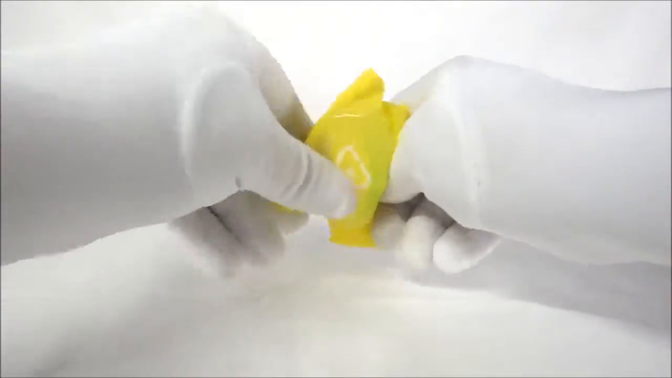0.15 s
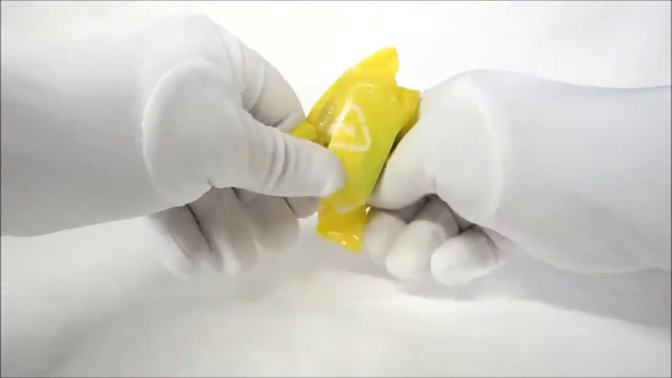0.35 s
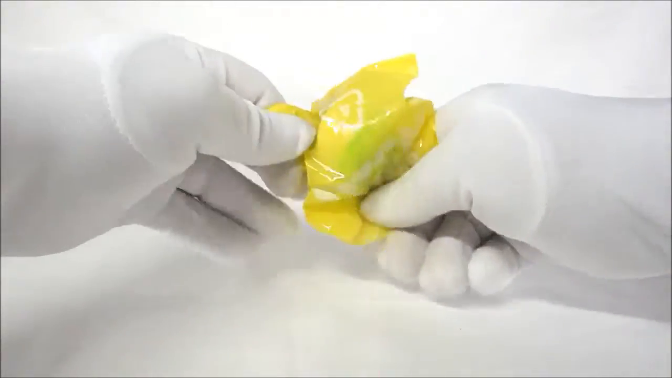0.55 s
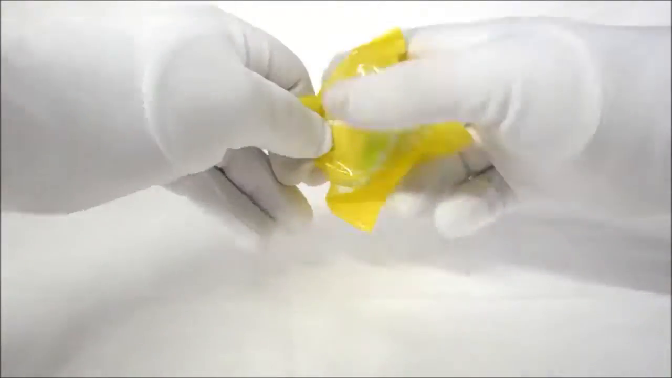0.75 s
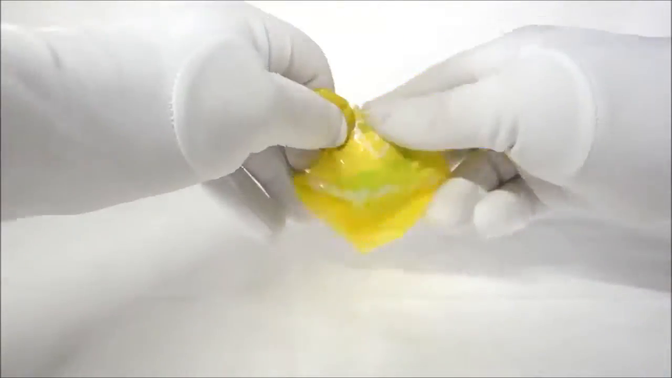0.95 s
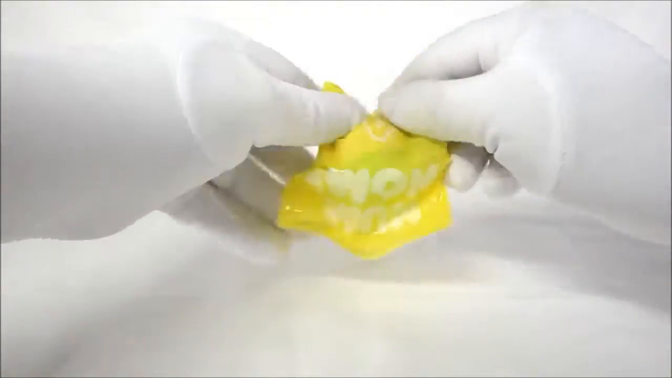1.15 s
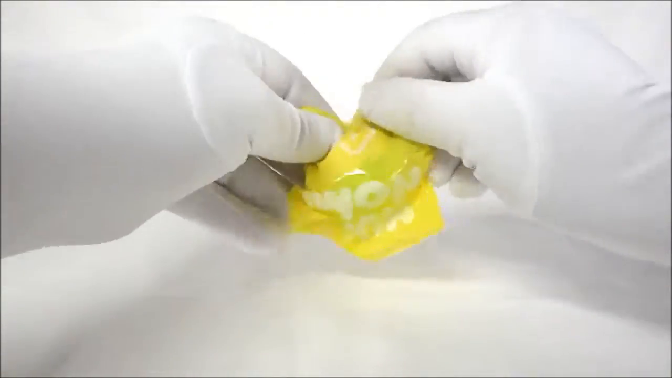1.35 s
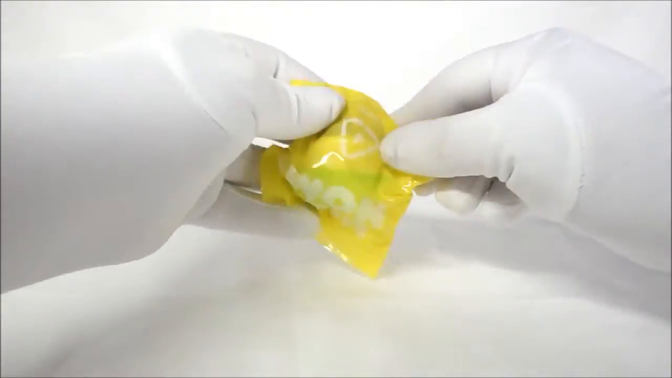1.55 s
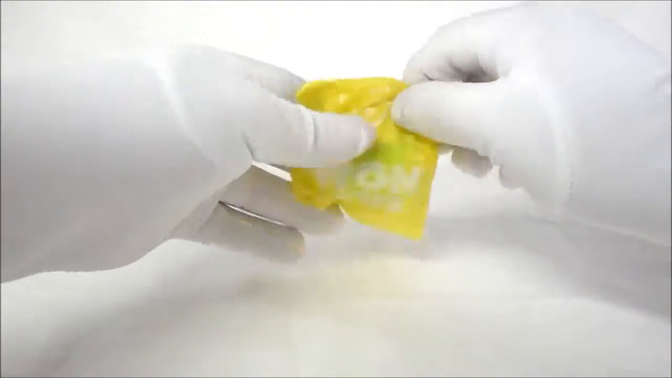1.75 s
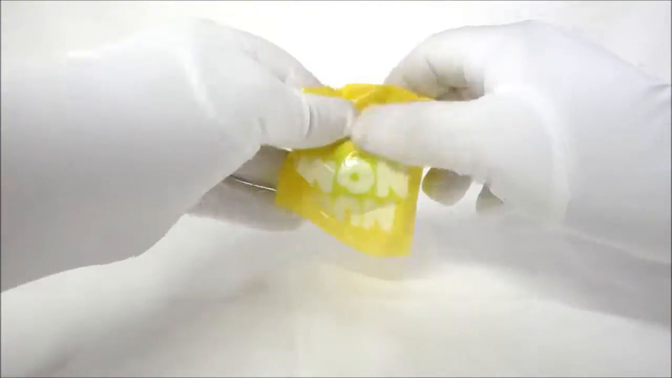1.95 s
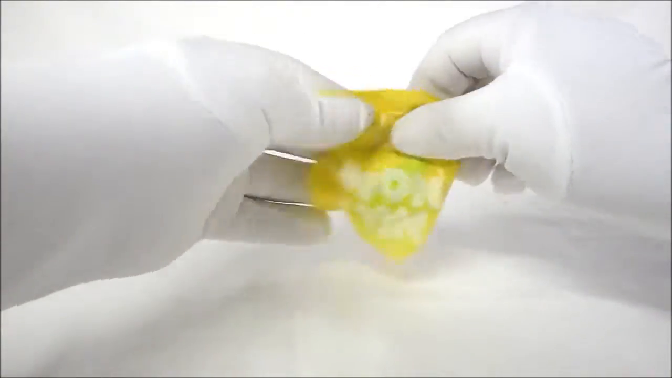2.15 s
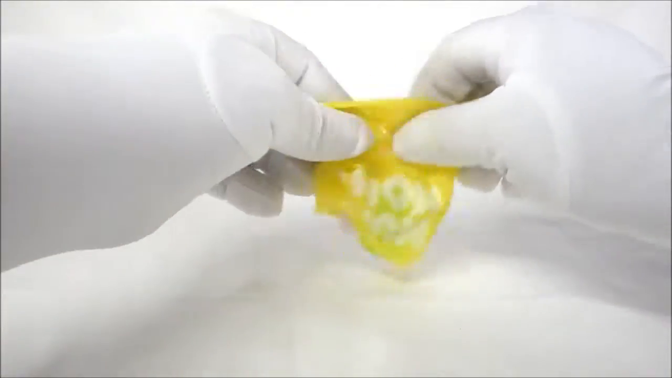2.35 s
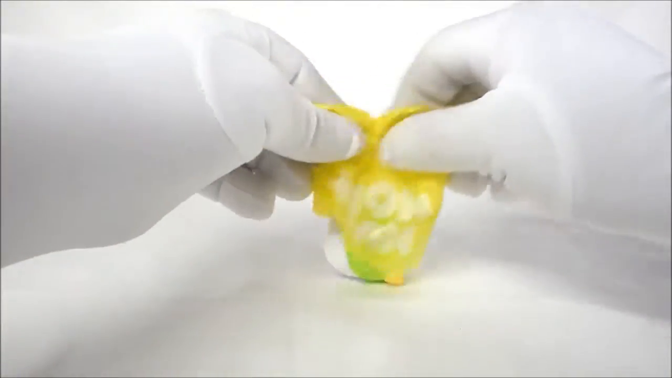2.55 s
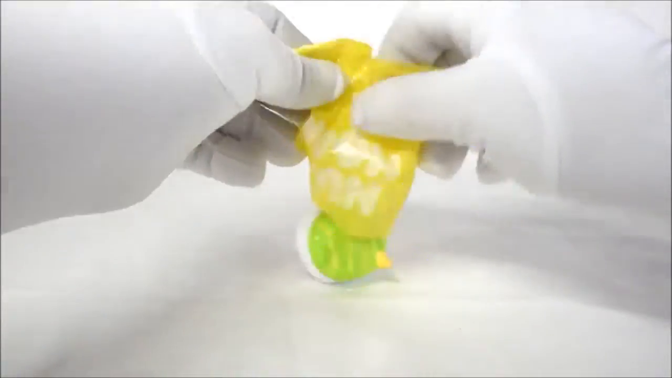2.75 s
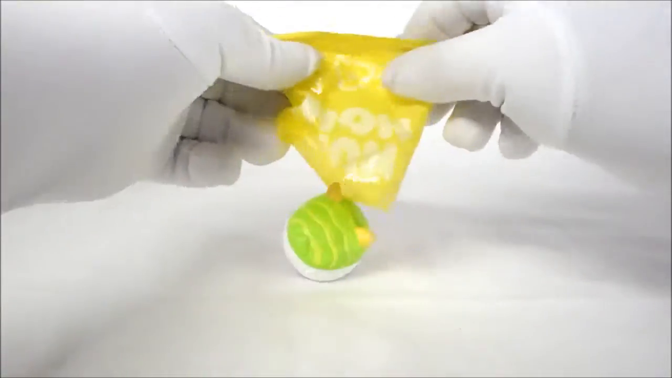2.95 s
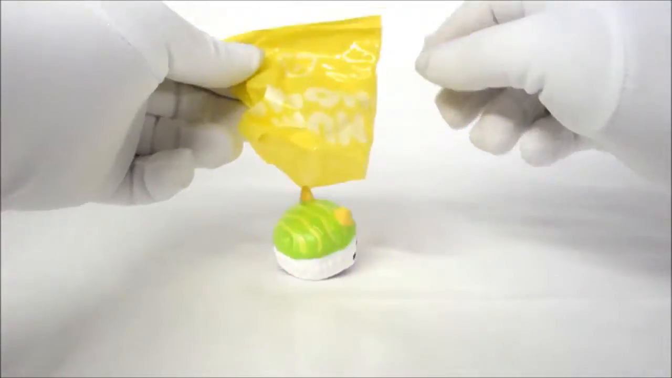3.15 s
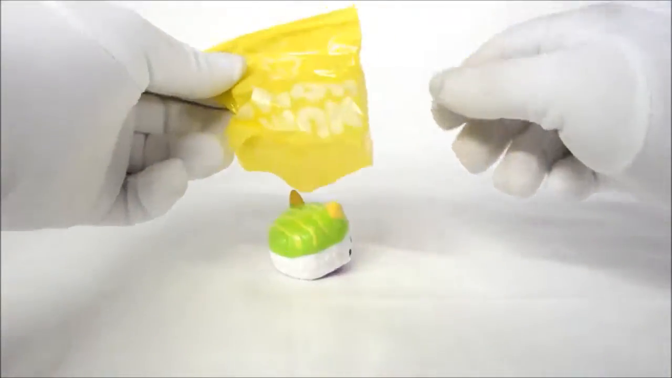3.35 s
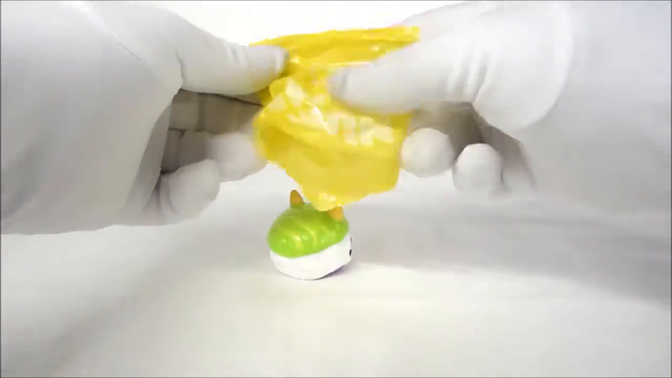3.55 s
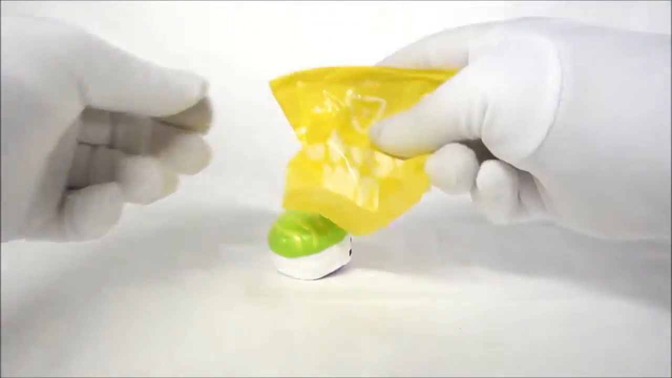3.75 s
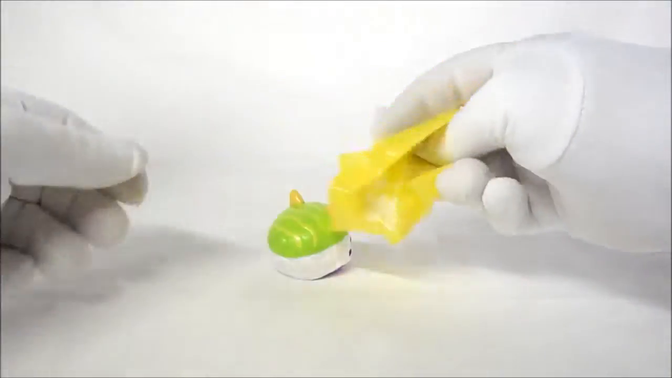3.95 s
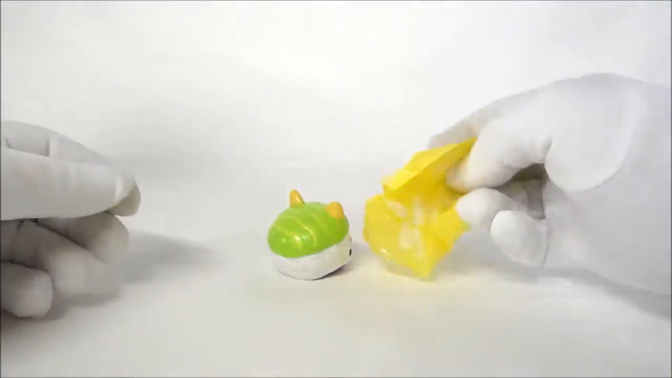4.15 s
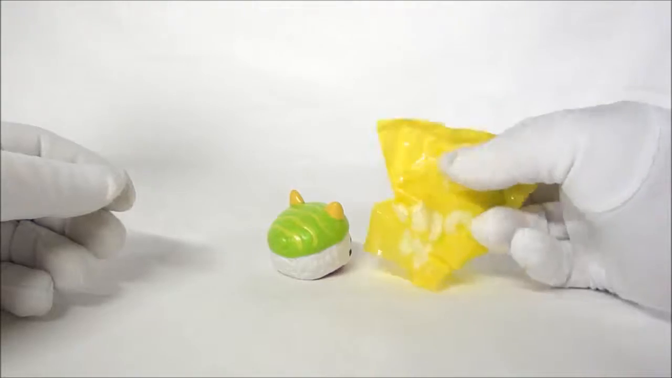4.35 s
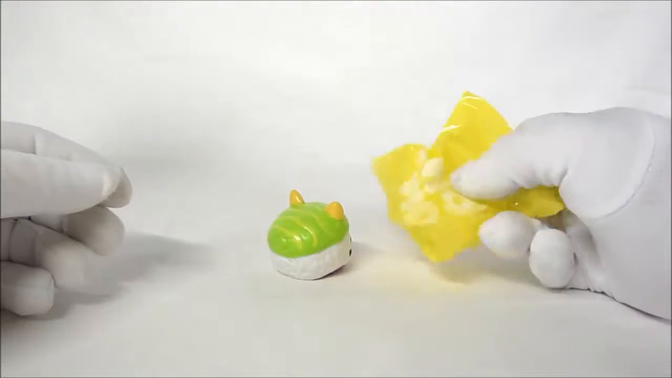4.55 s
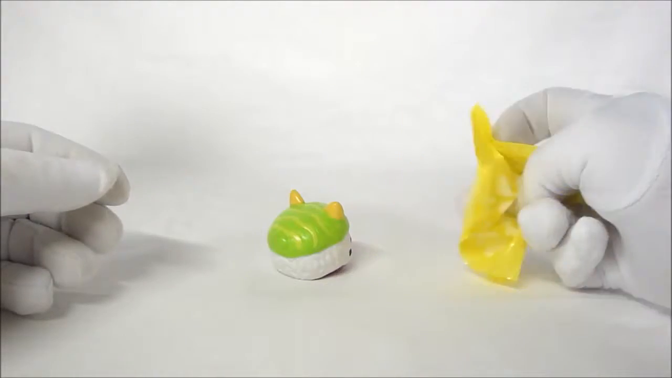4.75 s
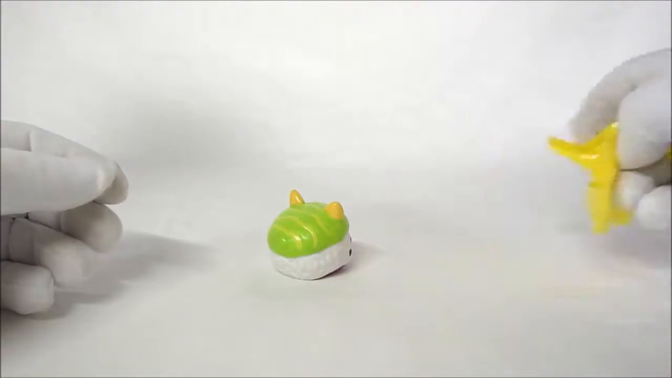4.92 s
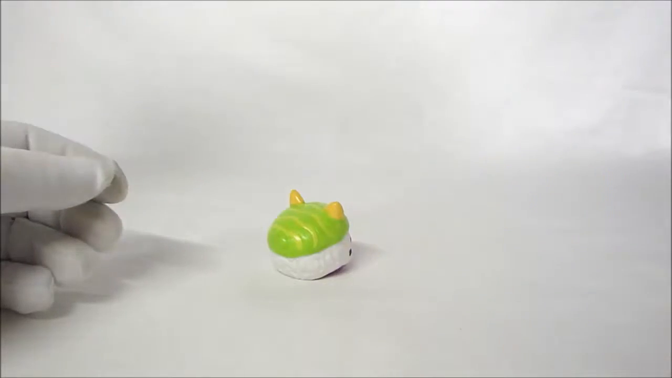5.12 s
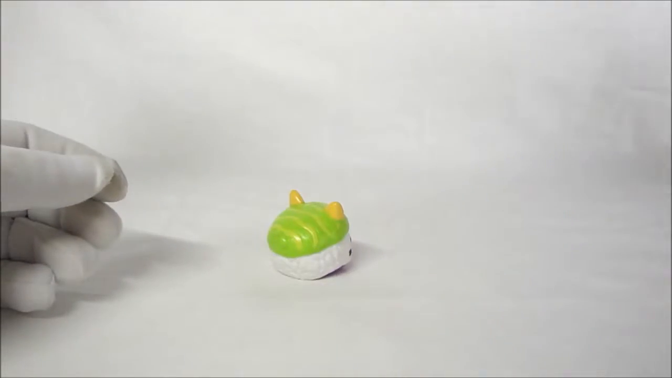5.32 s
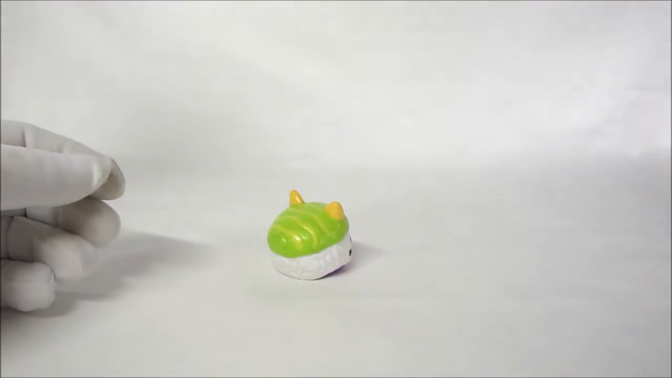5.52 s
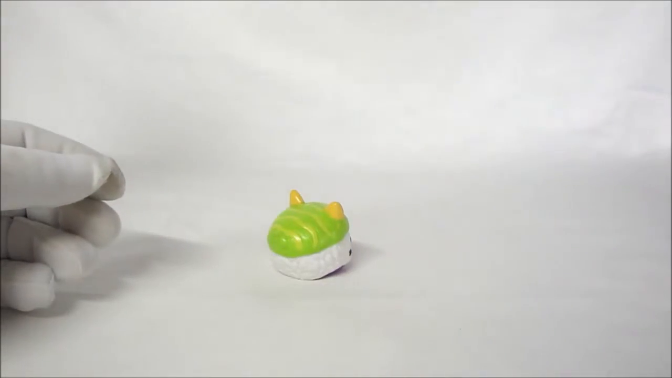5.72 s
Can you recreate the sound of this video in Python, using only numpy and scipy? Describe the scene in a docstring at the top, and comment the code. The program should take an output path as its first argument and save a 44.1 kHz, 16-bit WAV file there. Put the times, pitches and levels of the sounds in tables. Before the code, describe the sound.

Gloved hands twist and pull a thin plastic toy wrapper very close to the microphone. Crisp high snaps and papery pops ride on a fine rustle, getting louder and denser for nearly three seconds. After a brief lull comes a sharp burst, then lighter, scattered crackles as the empty wrapper is bunched and put aside. A small room adds a short tail; soft steady hiss lies beneath.

```python
"""A fine plastic rustle over a faint steady room noise, then sharp snaps: gloved hands work open a thin toy wrapper.
They are close to the microphone in a small room, and at the end they put the wrapper aside.
Every buckle of the film is a snap: the crease rings high and briefly, the panel beside it lower and longer.
Squeezes drive smaller random buckles and a dense rustle of tiny grains; a glove rasps and bumps softly.
One early bounce off a hard surface and a short noise tail make the room."""
import sys
import numpy as np
from scipy import signal
from scipy.fft import rfft, irfft
from scipy.io import wavfile
from scipy.ndimage import uniform_filter1d

SR = 44100
rng = np.random.default_rng(int(sys.argv[2]) if len(sys.argv) > 2 else 0)


def persist_wave(psi):
    """Save psi, clipped to +-1, as 16-bit WAV."""
    counts = np.round(np.clip(psi, -1, 1) * 32767).astype(np.int16)
    wavfile.write(sys.argv[1], SR, np.atleast_2d(counts).T)


N = 259295
TIME = np.arange(N) / SR  # seconds

# spectrum of the steady room noise, relative: pitch_hz [Hz], density_db [dB per Hz]
ROOM_NOISE_SPECTRUM = [(25, -12), (60, -22), (100, -11), (150, -5), (220, -1), (350, 2.5), (600, 3),
                       (1000, 0), (2000, -4.5), (4000, -10), (8000, -12), (14000, -17)]
# light rustle of film that is merely held: start_s [s], level_db [dB, before trims and colour]
HOLDING_LEVELS = [(0, -43), (0.45, -47), (0.9, -44), (1.42, -44), (1.75, -44), (1.97, -46), (2.13, -49),
                  (2.4, -41), (2.8, -49), (2.93, -56.5), (3.05, -44), (3.15, -66), (3.57, -65), (3.66, -42),
                  (3.79, -54), (3.98, -47), (4.19, -52), (4.3, -50), (4.8, -57), (5.07, -52), (5.4, -53),
                  (5.85, -66)]
# the fingers pull or squeeze the film; full strength is reached at start_s:
# start_s [s], length_s [s], crease_db [dB], panel_db [dB], levels before trims and colour
FILM_SQUEEZES = [(0.001, 0.024, -46.0, -48.5), (0.049, 0.037, -35.0, -37.5), (0.119, 0.031, -40.5, -38.5),
                 (0.228, 0.029, -47.0, -36.0), (0.258, 0.048, -33.5, -45.5), (0.327, 0.045, -37.0, -38.5),
                 (0.524, 0.043, -36.0, -37.5), (0.677, 0.016, -33.5, -40.5), (0.72, 0.041, -33.5, -34.5),
                 (0.791, 0.048, -43.0, -42.0), (0.858, 0.03, -27.5, -32.5), (0.934, 0.031, -33.0, -46.0),
                 (0.966, 0.046, -33.5, -35.0), (1.025, 0.053, -42.5, -37.0), (1.194, 0.098, -38.5, -43.0),
                 (1.361, 0.022, -39, -36), (1.46, 0.09, -30.5, -36.0), (1.556, 0.06, -27.0, -32.0),
                 (1.641, 0.055, -43.0, -43.0), (1.701, 0.058, -32.0, -30.5), (1.794, 0.023, -29.5, -31.0),
                 (1.864, 0.034, -32.5, -42.0), (2.019, 0.081, -31.0, -34.0), (2.162, 0.052, -41.5, -35.5),
                 (2.275, 0.09, -32.5, -37.0), (2.394, 0.017, -26.5, -31.5), (2.53, 0.028, -27.0, -28.0),
                 (2.602, 0.037, -31.0, -33.5), (2.68, 0.028, -29.0, -32.0), (2.742, 0.017, -27.5, -31.0),
                 (2.781, 0.014, -26, -31.0), (2.844, 0.02, -30.0, -34.0), (3.615, 0.028, -27.5, -34.5),
                 (3.653, 0.011, -41.5, -35.0), (3.691, 0.017, -31.5, -43), (3.95, 0.018, -33.0, -37.5),
                 (4.231, 0.036, -34.0, -34.0), (4.304, 0.017, -41.5, -41.5), (4.337, 0.039, -36.5, -37.0),
                 (4.472, 0.071, -40.0, -46.5), (4.564, 0.054, -43.0, -43.5), (4.676, 0.013, -27.0, -31.0),
                 (4.716, 0.087, -35.0, -36.5), (4.82, 0.013, -28.5, -31.0), (4.848, 0.022, -37, -50),
                 (4.908, 0.061, -33.0, -39.0), (4.979, 0.048, -39.0, -53.0), (5.111, 0.102, -39.5, -46.0),
                 (5.395, 0.008, -42.5, -42.5), (5.518, 0.011, -44.5, -44.5), (5.668, 0.008, -45.0, -44.5)]
# the distinct buckles; levels are rms over SNAP_S, before trims and colour:
# flip_s [s], crease_db [dB], crease_hz [Hz], panel_db [dB], panel_hz [Hz]
FILM_SNAPS = [(0.0143, -30.5, 4300, -24.0, 1940), (0.0435, -28.5, 4840, -37, 1380),
              (0.0542, -18.5, 6230, -22, 1140), (0.0608, -26.5, 5700, -23.5, 1730),
              (0.0782, -27.5, 5370, -24.5, 2090), (0.1244, -26, 7200, -29.5, 2600),
              (0.1483, -29.5, 4760, -24.5, 1860), (0.193, -29, 5350, -32, 2430),
              (0.2614, -27, 4950, -27, 1036), (0.2894, -24.5, 5200, -29.5, 1620),
              (0.297, -24, 7300, -24, 1730), (0.3278, -26, 6360, -33.0, 1270),
              (0.3689, -24.5, 8350, -24, 1760), (0.4054, -32, 5200, -39, 2370),
              (0.49, -25.5, 6350, -48.0, 1560), (0.5062, -26.5, 7340, -31, 1620),
              (0.5267, -27, 6370, -24.5, 1200), (0.5533, -18, 5640, -23.5, 2060),
              (0.6016, -22.5, 4300, -32.5, 1390), (0.6735, -23, 4970, -30.5, 1130),
              (0.6911, -25, 5000, -28.5, 1000), (0.7508, -26, 6200, -25, 1840),
              (0.7564, -24, 6800, -23.5, 1940), (0.8092, -26.0, 5000, -38, 1960),
              (0.8257, -23.5, 6700, -36.0, 1170), (0.8507, -20.5, 6500, -23.5, 1610),
              (0.871, -28, 6300, -21.5, 1360), (0.9331, -21, 6100, -27, 1110),
              (0.9739, -17.5, 6000, -21.5, 1740), (0.9942, -27, 5600, -26, 1750),
              (1.0263, -20.5, 7000, -34, 2600), (1.0435, -22.0, 9200, -44, 1030),
              (1.0549, -22.5, 6360, -29, 1380), (1.0651, -21, 6900, -37, 1450),
              (1.096, -31.0, 7500, -39, 1800), (1.1207, -17, 5800, -41.5, 2070),
              (1.1672, -28, 4900, -31.5, 1490), (1.1737, -26, 5900, -39, 2030),
              (1.2157, -19.5, 6700, -30, 3040), (1.229, -18.5, 5460, -22.5, 2250),
              (1.2614, -29, 5800, -29, 2020), (1.2772, -21.5, 6100, -27.0, 2270),
              (1.2994, -26.5, 5600, -28.0, 1820), (1.3392, -26.5, 4550, -34.5, 1650),
              (1.363, -22, 5400, -28, 1670), (1.374, -27, 6400, -48, 1310),
              (1.441, -26.5, 7050, -28.5, 1460), (1.5946, -18, 6150, -25, 1470),
              (1.6419, -25.5, 5740, -33, 1660), (1.6827, -29, 5400, -29.0, 1850),
              (1.716, -17.5, 5800, -23.0, 1920), (1.749, -23.0, 6800, -25, 2010),
              (1.7691, -21.5, 7050, -33, 1370), (1.791, -17.5, 5900, -28.5, 1450),
              (1.8072, -21.5, 6200, -34, 2540), (1.8371, -20, 5300, -25, 1540),
              (1.8903, -23, 6100, -27, 1850), (1.8989, -21.5, 5100, -28, 1580),
              (1.945, -32.5, 5400, -37, 1260), (1.997, -28, 5800, -30.5, 2540),
              (2.0116, -16, 6130, -26.5, 1120), (2.026, -20.5, 7760, -27, 1500),
              (2.0655, -22.5, 6400, -35, 2880), (2.0888, -16.5, 6800, -48.0, 1560),
              (2.093, -22.0, 5100, -33, 1390), (2.1507, -29.0, 5100, -31, 740),
              (2.1798, -16, 5500, -20, 1350), (2.2066, -19, 8200, -23, 1600),
              (2.2219, -26, 6100, -48.0, 3090), (2.256, -17, 7060, -40, 1650),
              (2.2956, -17.5, 6800, -33, 1170), (2.301, -19, 5500, -24.5, 1740),
              (2.3198, -32, 5200, -25, 2400), (2.3515, -24.5, 6300, -32, 1450),
              (2.3797, -26, 5600, -23.5, 1700), (2.3873, -14.5, 6800, -28, 1470),
              (2.4067, -17, 7060, -29, 1010), (2.4192, -21, 5700, -33, 1800),
              (2.4278, -22, 5800, -29, 1460), (2.454, -27, 9600, -38, 1740),
              (2.4588, -18, 6200, -21.5, 1260), (2.4657, -21.5, 6200, -33, 1400),
              (2.4758, -26, 7300, -32, 1520), (2.4836, -18, 6300, -32, 1850),
              (2.4889, -24, 6400, -32, 1630), (2.539, -19.5, 5700, -23, 1580),
              (2.545, -28, 4600, -19, 1750), (2.5606, -21.5, 6000, -17.5, 1400),
              (2.5872, -23.5, 5570, -30, 1200), (2.5999, -22.5, 7800, -29, 1750),
              (2.6167, -16, 4450, -22, 1560), (2.633, -20, 7100, -39.0, 990),
              (2.6934, -17.5, 5350, -22, 1110), (2.6979, -25, 5800, -18.5, 1080),
              (2.7057, -19, 5700, -24.5, 1470), (2.7764, -18.0, 4250, -28, 1650),
              (2.7796, -18.5, 4500, -32.0, 2800), (2.7909, -15, 5700, -20, 2080),
              (2.8224, -23, 6100, -43.5, 1640), (2.856, -21, 5740, -27.5, 1870),
              (2.8609, -17.5, 4540, -26, 1000), (2.9766, -35.5, 5000, -41, 1810),
              (3.0263, -30.5, 7600, -30.0, 2440), (3.0397, -32, 8000, -48.0, 1380),
              (3.0462, -28.5, 6000, -31, 1590), (3.1914, -44, 4400, -42, 1080),
              (3.295, -49.0, 8400, -42.5, 1840), (3.6037, -30, 6100, -25, 1350),
              (3.6192, -16, 6700, -24.5, 1530), (3.6331, -16.5, 6700, -27, 1010),
              (3.6372, -15.5, 7400, -40.0, 3000), (3.681, -28, 5640, -26.5, 1070),
              (3.6982, -17.0, 7450, -38, 3290), (3.7774, -34, 4600, -40, 1560),
              (3.8141, -22.5, 6500, -23, 1290), (3.8348, -19, 5970, -38, 1340),
              (3.8804, -28, 6440, -39, 1590), (3.8958, -39, 6300, -31.5, 2100),
              (3.9491, -26.0, 8450, -26, 2510), (4.013, -38, 5800, -32.5, 1720),
              (4.0243, -25, 6600, -35, 1990), (4.0563, -34.5, 7800, -33, 2280),
              (4.099, -39.5, 3800, -39.0, 1870), (4.1326, -33.5, 6700, -33, 2020),
              (4.161, -46, 6300, -37.5, 2400), (4.2261, -18.5, 5900, -22.0, 3200),
              (4.253, -32, 6400, -27.5, 1980), (4.2918, -44, 7100, -31.5, 2270),
              (4.3037, -34, 7400, -37, 1620), (4.4082, -34, 7200, -31.5, 1810),
              (4.4203, -36, 5500, -34.5, 2100), (4.473, -21.5, 7140, -29, 1300),
              (4.4935, -25.5, 7700, -36, 2860), (4.5218, -29, 3600, -31, 2440),
              (4.5366, -32.5, 6700, -25, 2620), (4.578, -34, 6800, -32, 3050),
              (4.611, -29, 5000, -30.5, 1800), (4.6345, -17.5, 9900, -27, 2550),
              (4.73, -23, 4600, -30, 2740), (4.7474, -23.0, 5740, -26, 2650),
              (4.7639, -15.5, 8500, -34, 1020), (4.7813, -23.5, 8600, -31, 1580),
              (4.7968, -24.5, 4900, -38, 1130), (4.8361, -26, 6400, -35, 1370),
              (4.9152, -23, 9300, -31.5, 2470), (4.9683, -23, 6840, -28, 2100),
              (5.0124, -27, 7880, -24.5, 1820), (5.1274, -24, 6400, -34.5, 2250),
              (5.281, -40.5, 6700, -38.0, 1920), (5.3368, -42, 6400, -38, 1880),
              (5.3909, -36.0, 6300, -36, 2050), (5.5977, -54.5, 3000, -40, 1730)]
# a glove slides on the film: start_s [s], length_s [s], level_db [dB, before fades and colour], pitch_hz [Hz]
GLOVE_SLIDES = [(.604, .05, -38, 3640)]
# soft bumps of gloves and film: start_s [s], peak_db [dB, before distance], pitch_hz [Hz], t60_s [s]
GLOVE_BUMPS = [(1.227, -53, 70, 0.031), (1.507, -35, 320, 0.029), (2.01, -57, 70, .03),
               (2.177, -37, 346, 0.029), (3.603, -31, 355, 0.014), (3.636, -50, 55, 0.037),
               (4.312, -33, 326, 0.034), (4.632, -47, 71, 0.017), (4.763, -55, 70, .03)]
# colour of the film's sound at the microphone: pitch_hz [Hz], level_db [dB]
FILM_COLOUR = [(40, -28), (150, -21), (330, -2), (550, -3), (950, 5), (1400, 3), (2100, 0.5), (2700, 3),
               (4200, 2.5), (6500, 0.5), (13500, 5)]
# changing top treble as the wrapper opens and is turned away: time_s [s], level above SHEEN_HZ [dB]
TREBLE_SHEEN = [(0, 2), (2.0, 0), (3.0, 6.5), (3.7, -3.5), (4.25, -5), (5.0, -8)]
# the wrapper is carried out of reach; the room swells, then falls back: time_s [s], direct_db [dB], room_db [dB]
FILM_DISTANCE = [(4.8, -1, -2), (5.15, -2, 3.5), (5.5, -0.5, -1)]
# colour of the room's tail: pitch_hz [Hz], level_db [dB]
TAIL_COLOUR = [(100, 25), (350, 2.5), (1200, 1), (4000, -1), (8000, 2), (14000, -15)]

ROOM_NOISE_DB = -48.5  # rms of the hiss
HUM_HZ, HUM_DB = 149.5, -72.5  # pitch and rms
# a squeeze builds up over ATTACK_S, holds, and settles with time constant RELEASE_S
ATTACK_S, RELEASE_S = .01, .009
# a fold starts to yield up to LEAD_S before it flips
SNAP_S, LEAD_S = .004, .004
# middling buckles: level against the film's work, and spread
CRACKLE_DB, CRACKLE_SCATTER_DB = 1, 2.5
# from FOLDED_S on the wrapper is bunched in one hand: panels of rustle and crackle ring higher by this factor
FOLDED_S, FOLDED_RATIO = 3.9, 1.69
SHEEN_HZ = 11000
TOP_HZ = 13850  # highest film mode and upper limit of the recorder


def undb(db):
    """Decibels to gain."""
    return 10 ** (np.asarray(db) / 20)


def rms(x):
    """Root mean square."""
    return np.sqrt(np.mean(x ** 2))


def colour(x, points):
    """Filter by (Hz, dB) points joined along a logarithmic pitch axis."""
    hz, db = np.transpose(points)
    bins = np.maximum(np.fft.rfftfreq(len(x), 1 / SR), 1)
    gain = undb(np.interp(np.log(bins), np.log(hz), db))
    return irfft(rfft(x) * gain, len(x))


def add(out, sound, start_s):
    """Mix a sound in at a time."""
    start = max(int(start_s * SR), 0)
    part = sound[:max(len(out) - start, 0)]
    out[start:start + len(part)] += part


def curves(table):
    """Each column of a (s, ..) table, joined by straight lines."""
    s, *columns = np.transpose(table)
    return [np.interp(TIME, s, column) for column in columns]


def room_noise():
    """A soft steady hiss of coloured random noise with a faint sine hum."""
    hiss = colour(rng.standard_normal(N), ROOM_NOISE_SPECTRUM)
    hum = np.sqrt(2) * np.sin(2 * np.pi * HUM_HZ * TIME)
    return undb(ROOM_NOISE_DB) * hiss / rms(hiss) + undb(HUM_DB) * hum


def handling(holding_panel_db=-1.0):
    """How hard folds and panels are worked at each moment: the squeezes add their power to a light hold."""
    holding = undb(curves(HOLDING_LEVELS)[0])
    fold_power = holding ** 2
    panel_power = (holding * undb(holding_panel_db)) ** 2
    for start, length, crease_db, panel_db in FILM_SQUEEZES:
        t = np.arange(int((ATTACK_S + length + 6 * RELEASE_S) * SR)) / SR - ATTACK_S
        build_up = np.minimum(1 + t / ATTACK_S, 1)
        settling = np.exp(-np.maximum(t - length, 0) / RELEASE_S)
        shape = build_up * settling
        add(fold_power, (undb(crease_db) * shape) ** 2, start - ATTACK_S)
        add(panel_power, (undb(panel_db) * shape) ** 2, start - ATTACK_S)
    return np.sqrt(fold_power), np.sqrt(panel_power)


def ring(centre_hz, octaves, t60_s, count=36):
    """Unit-energy ring of one patch of film: its own random modes, strongest near the centre."""
    t = np.arange(400) / SR
    lowest_hz = 260
    steps = (np.arange(count) + rng.random(count)) / count
    hz = lowest_hz * (TOP_HZ / lowest_hz) ** steps
    resonance = 1 / (1 + (np.log2(hz / centre_hz) / octaves) ** 2)
    weight = rng.choice([-1, 1], count) * (.5 + rng.random(count)) * resonance
    # higher modes die sooner, each with its own scatter
    t60 = t60_s * np.sqrt(centre_hz / hz) * np.exp(0.33 * rng.standard_normal(count))
    turn = np.outer(2 * np.pi * hz, t).astype(np.float32)
    fade = np.outer(np.log(1000) / t60, t).astype(np.float32)
    modes = np.sin(turn) * np.exp(-np.minimum(fade, 20))
    sound = (weight / np.sqrt(t60)) @ modes
    return sound / np.linalg.norm(sound)


def crease(hz, octaves=0.3, cycles=15):
    """The sharp fold flips over: a bright tick, its 60 dB decay counted in cycles and scattered at random."""
    return ring(hz, octaves, cycles / hz * np.exp(0.26 * rng.standard_normal()))


def panel(hz, octaves=0.42, t60_s=0.0093):
    """The flat film beside the fold swings with it: a papery pop."""
    return ring(hz, octaves, t60_s)


def grains(patches, per_s, scatter_db):
    """Tiny buckles at random moments on random patches: many weak, a few strong; rms near 1."""
    chance = rng.random(N)
    size = rng.exponential(size=N)
    which = rng.integers(len(patches), size=N)
    strikes = (chance < per_s / SR) * undb(scatter_db * np.minimum(size, 4))
    # the fingers feed in energy steadily, so a strong buckle leaves less for its neighbours
    nearby_power = np.abs(uniform_filter1d(strikes ** 2, size=1100))
    strikes /= np.sqrt(nearby_power + 1e-6)
    out = np.zeros(N)
    for i in np.flatnonzero(strikes):
        add(out, strikes[i] * patches[which[i]], i / SR)
    return out


def rustle(fold_work, panel_work, crease_hz=5200, panel_hz=1250, crease_trim_db=-1.2, panel_trim_db=-0.93,
           count=200):
    """Small folds and panels of many sizes give way all over the film, as loud as it is worked."""
    smallness = np.exp(0.61 * np.linspace(-1, 1, count))
    folds = grains([crease(crease_hz * k) for k in smallness], per_s=1900, scatter_db=5.0)

    def panel_grains(hz):
        """Flat patches swing around one middle pitch."""
        return grains([panel(hz * k) for k in smallness], per_s=1100, scatter_db=6.5)

    spread = panel_grains(panel_hz)
    bunched = panel_grains(panel_hz * FOLDED_RATIO)
    flats = np.where(TIME < FOLDED_S, spread, bunched)
    return folds * fold_work * undb(crease_trim_db) + flats * panel_work * undb(panel_trim_db)


def in_steps(patch, hz, before_s=.0013, after_s=.0012, early_db=-9, late_db=-8, clean_hz=7000, count=3):
    """A fold starts to yield, flips at LEAD_S, then settles; the total energy is 1."""
    sound = np.zeros(1024)
    add(sound, patch(hz), LEAD_S)
    # the smallest, stiffest folds go over in a nearly clean move
    stagger = 1 / np.sqrt(1 + (hz / clean_hz) ** 4)
    for early, late, early_size, late_size in rng.exponential(size=(count, 4)):
        early_gain = stagger * undb(early_db) * np.sqrt(early_size) * np.exp(-early / 2)
        late_gain = stagger * undb(late_db) * np.sqrt(late_size) * np.exp(-late / 2)
        add(sound, early_gain * patch(hz), LEAD_S - before_s * early)
        add(sound, late_gain * patch(hz), LEAD_S + after_s * late)
    return sound / np.linalg.norm(sound)


def buckle(crease_gain, crease_hz, panel_gain, panel_hz):
    """One snap: a fold flips and the panel beside it swings along."""
    fold = crease_gain * in_steps(crease, crease_hz)
    flat = panel_gain * in_steps(panel, panel_hz)
    return np.sqrt(SNAP_S * SR) * (fold + flat)  # unit energy to unit rms over SNAP_S


def crackle(fold_work, panel_work, crease_hz=5900, panel_hz=1400, crease_octaves=0.27, panel_octaves=0.63,
            count=170):
    """Middling buckles at random: they come faster and louder the harder the film is worked."""
    out = np.zeros(N)
    strain = np.cumsum((fold_work + panel_work) ** .75)
    # one buckle in each equal share of the strain
    moments = np.searchsorted(strain, strain[-1] * (np.arange(count) + rng.random(count)) / count)
    for i, (size, fold, flat) in zip(moments, rng.standard_normal((count, 3))):
        gain = undb(CRACKLE_DB + CRACKLE_SCATTER_DB * min(size, 1.5))
        bunching = FOLDED_RATIO if i / SR > FOLDED_S else 1
        fold_hz = crease_hz * 2 ** (crease_octaves * fold)
        flat_hz = panel_hz * bunching * 2 ** (panel_octaves * flat)
        sound = buckle(gain * fold_work[i], fold_hz, gain * panel_work[i], flat_hz)
        add(out, sound, i / SR - LEAD_S)
    return out


def snaps(crease_trim_db=.5, panel_trim_db=0.8):
    """The distinct buckles, each with a fold and a panel of its own pitch and level."""
    out = np.zeros(N)
    for s, crease_db, crease_hz, panel_db, panel_hz in FILM_SNAPS:
        crease_gain = undb(crease_db + crease_trim_db)
        panel_gain = undb(panel_db + panel_trim_db)
        add(out, buckle(crease_gain, crease_hz, panel_gain, panel_hz), s - LEAD_S)
    return out


def slides(width_hz=450, fade_s=0.053):
    """The glove catches and slips on the film: spiky noise in a narrow band, a thin fading rasp."""
    out = np.zeros(N)
    for s, length, db, hz in GLOVE_SLIDES:
        t = np.arange(int(length * SR)) / SR
        slips = rng.standard_normal(len(t)) ** 3  # cubing makes a few slips stand out
        band = signal.butter(2, [hz - width_hz, hz + width_hz], "band", fs=SR, output="sos")
        rasp = signal.sosfilt(band, slips)
        fade = np.exp(-t / fade_s) * signal.windows.tukey(len(t), .5)
        add(out, undb(db) * rasp / rms(rasp) * fade, s)
    return out


def bumps(push_s=0.0037):
    """A padded contact pushes slowly and leaves only one low, damped swing."""
    out = np.zeros(N)
    t = np.arange(SR // 10) / SR
    for s, db, hz, t60 in GLOVE_BUMPS:
        decay = np.exp(-np.log(1000) * t / t60)
        swing = np.sin(2 * np.pi * hz * t) * decay * (1 - np.exp(-t / push_s))
        add(out, undb(db) * swing / np.abs(swing).max(), s)
    return out


def sheen(x):
    """Raise or lower the top treble as the wrapper faces the microphone or turns away."""
    high_pass = signal.butter(3, SHEEN_HZ, "high", fs=SR, output="sos")
    top = signal.sosfiltfilt(high_pass, x)
    return x + (undb(curves(TREBLE_SHEEN)[0]) - 1) * top


def room(x, t60_s=0.17, wet_db=-15, bounce_s=0.0077, bounce_db=-18):
    """One early bounce off a hard surface and the short, duller noise tail of a small room."""
    t = np.arange(SR // 2) / SR
    onset = np.minimum(t / 0.00093, 1)
    tail = rng.standard_normal(len(t)) * np.exp(-np.log(1000) * t / t60_s) * onset
    tail = colour(tail, TAIL_COLOUR)
    response = undb(wet_db) * tail / np.linalg.norm(tail)
    add(response, undb([bounce_db]), bounce_s)
    return signal.oaconvolve(x, response)[:N]


def scene():
    """The wrapper close to the microphone, in its room."""
    work = handling()
    film = rustle(*work) + crackle(*work) + snaps() + slides()
    hands = sheen(colour(film, FILM_COLOUR)) + bumps()
    direct_db, room_db = curves(FILM_DISTANCE)
    direct = hands * undb(direct_db)
    reflected = room(hands * undb(room_db))
    return (direct + reflected + room_noise())[None]


def record(dry):
    """The highest peaks are softly rounded, and the recorder cuts the top."""
    low_pass = signal.ellip(8, .1, 50, TOP_HZ, fs=SR, output="sos")
    rounded = dry / (1 + (dry / .9) ** 4) ** .25
    return signal.sosfiltfilt(low_pass, rounded)


dry = scene()
out = record(dry)
persist_wave(out)
```